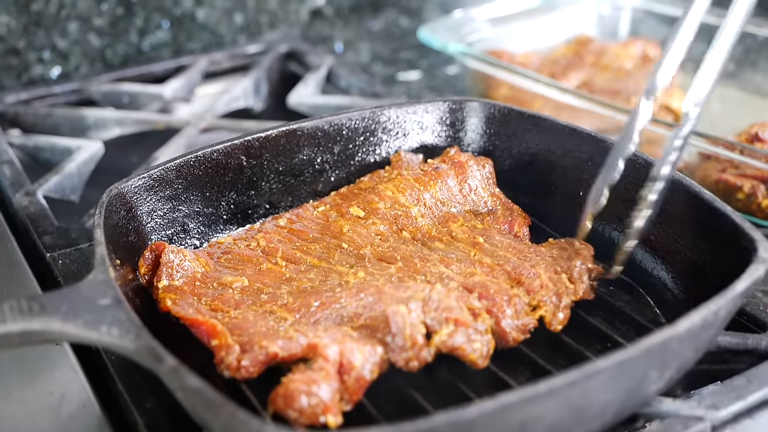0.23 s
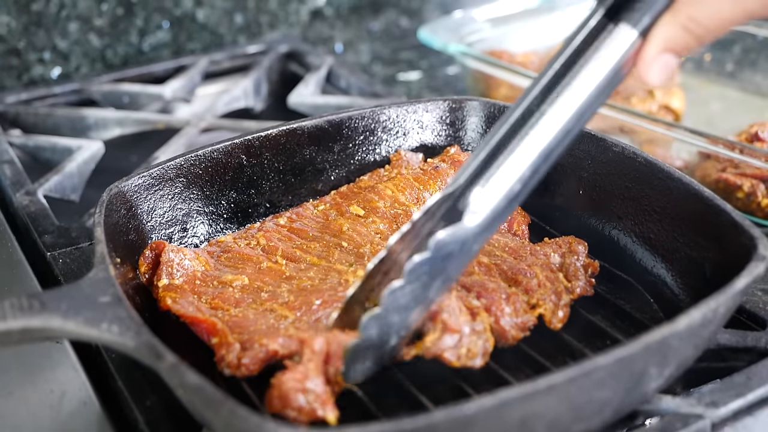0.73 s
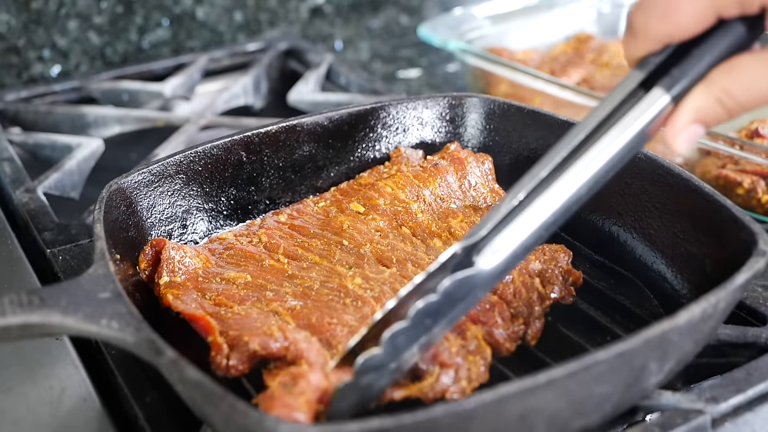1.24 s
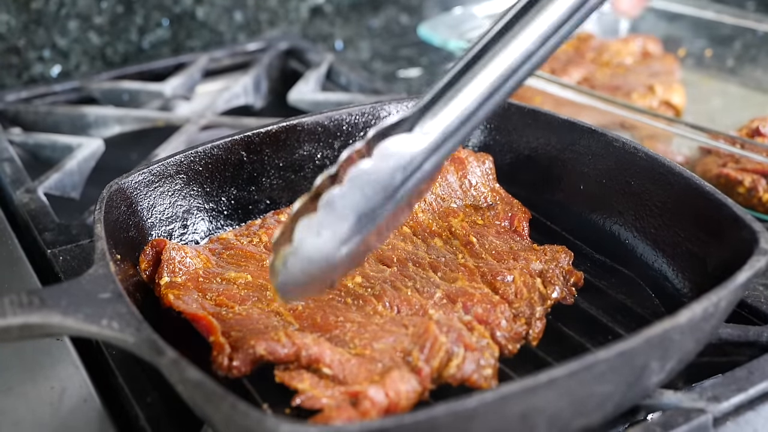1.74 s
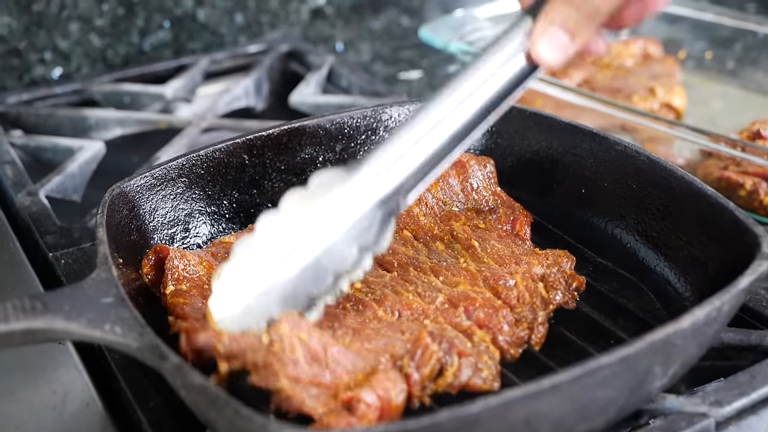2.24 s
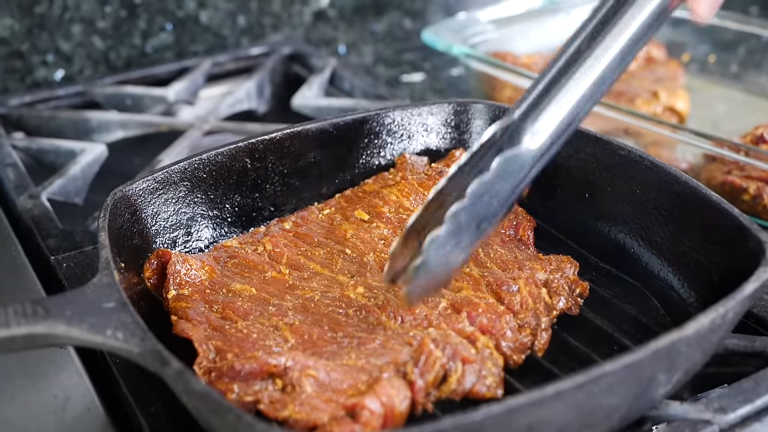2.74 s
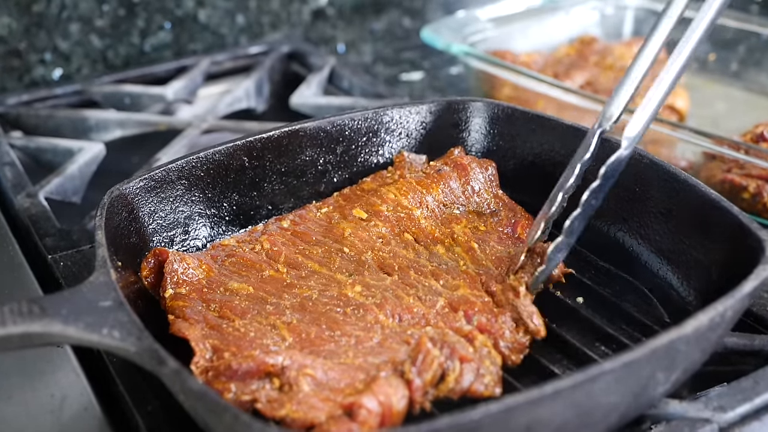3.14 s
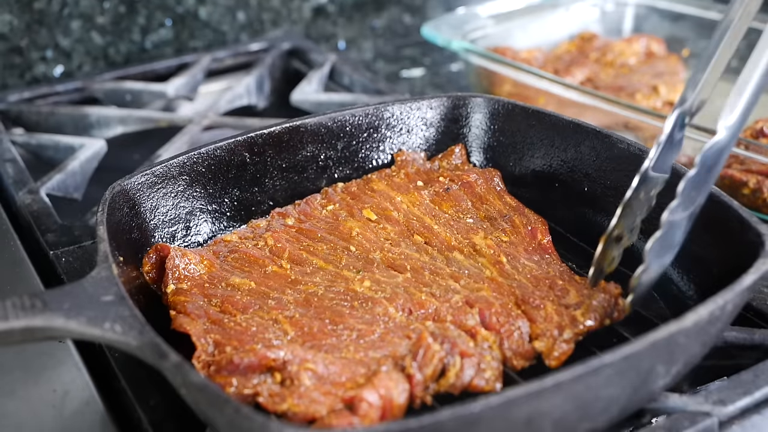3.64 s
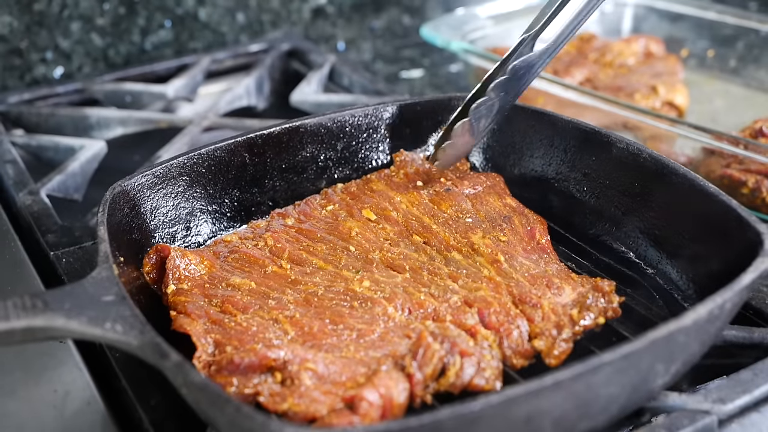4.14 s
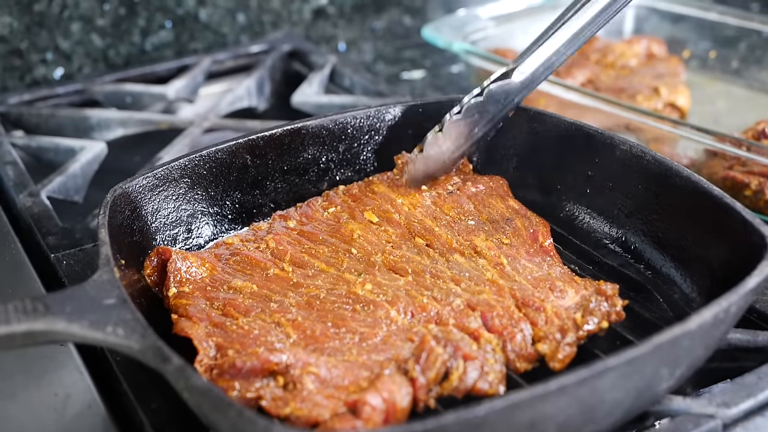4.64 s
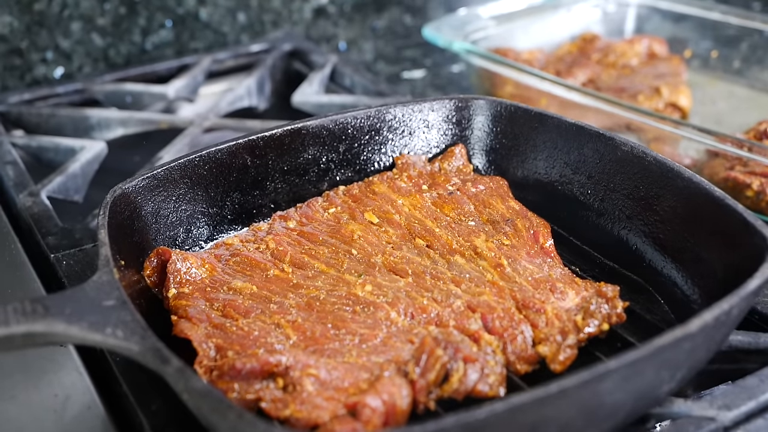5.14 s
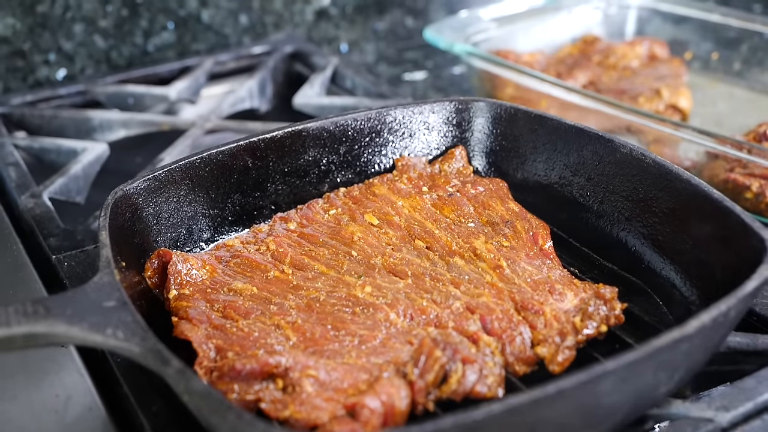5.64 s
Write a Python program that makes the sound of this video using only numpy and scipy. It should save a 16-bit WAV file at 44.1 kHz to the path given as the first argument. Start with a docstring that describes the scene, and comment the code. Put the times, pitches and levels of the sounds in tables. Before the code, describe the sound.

Continuous vigorous frying, already at full strength at the start and still going at the end. Fat spits in irregular crisp snaps, with brief squeaks of escaping steam. One short metal clank comes before one second; softer iron knocks follow past three seconds, along with a small flare of hiss as meat is pressed down. Faint low ventilation sits far below. Close microphone, little room sound, centred image.

```python
"""A dense, bright sizzle over a low fan hum: a wet steak frying in a ridged cast-iron pan in a kitchen.
The sizzle is noise with bubble and crackle grains, coloured by a spectrum and by air-channel resonances.
Short whistles are steam spurts, sharp cracks are water droplets in fat, and tongs ring against the iron
as decaying sines. Fan and burner are filtered noise and steady tones; a faint smeared copy adds width."""
import sys
import numpy as np
from scipy import signal
from scipy.io import wavfile
from scipy.ndimage import uniform_filter1d

SR = 44100
rng = np.random.default_rng(int(sys.argv[2]) if len(sys.argv) > 2 else 0)


def dump(signal):
    """Clip the signal to [-1, 1] and save it as 16-bit WAV at the path in sys.argv[1]."""
    limited = np.clip(np.atleast_2d(signal).T, -1, 1)
    pcm = np.round(limited * 32767).astype(np.int16)
    wavfile.write(sys.argv[1], SR, pcm)


N = 260466


def gain_of(db):
    """Converts decibels to an amplitude factor."""
    return 10 ** (np.asarray(db) / 20)


def evened(x):
    """Scales to rms 1."""
    return x / np.sqrt(np.mean(x ** 2) + 1e-20)


def read(points, hz):
    """Interpolates a spectrum on a log-frequency axis."""
    point_hz, value = np.transpose(points)
    return np.interp(np.log(hz + 1), np.log(point_hz + 1), value)


def add(mix, start_s, sound):
    """Mixes a sound in place, starting at start_s."""
    part = mix[round(start_s * SR):][:len(sound)]
    part += sound[:len(part)]


def shaped(x, field_db, size):
    """Filters x by a level in dB over frequency and time."""
    overlap = size * 3 // 4
    hz, t, z = signal.stft(x, SR, nperseg=size, noverlap=overlap)
    return signal.istft(z * gain_of(field_db(hz, t)), SR, nperseg=size, noverlap=overlap)[1][:N]


def coloured_noise(spectrum, size):
    """Steady noise of rms 1 with a given spectrum."""
    return evened(shaped(rng.standard_normal(N), lambda hz, t: read(spectrum, hz)[:, None], size))


def burst(hz, turns):
    """A few cycles under a bell envelope, mostly a pressure dip, centred on sample 100."""
    cycles = np.arange(-100, 101) * hz / SR
    phase_turns = rng.normal(0, .12)
    return -np.exp(-(cycles / turns) ** 2) * np.cos(2 * np.pi * (cycles + phase_turns))


def grains(lo_hz, hi_hz, turns, per_s, spread_db, count=24):
    """Bursts of many pitches at random moments; a few are much larger than the rest."""
    size_db = spread_db * np.minimum(rng.exponential(1, N), 3.6)
    size = gain_of(size_db) * (rng.random(N) < per_s / SR)
    kind, out = rng.integers(0, count, N), np.zeros(N)
    for k, hz in enumerate(np.geomspace(lo_hz, hi_hz, count)):
        grain = burst(hz, turns) * hz  # equal height in the spectrum
        out += signal.oaconvolve(size * (kind == k), grain, "same")
    return evened(out)


# overall frying strength: (time [s], level [dB])
VIGOUR = [(0, 1), (.5, 1), (1.0, 0.25), (1.6, -0.5), (2.2, -.5), (2.65, 0.5), (3.3, -.5), (3.7, -.5),
          (4.05, 0.5), (4.5, -1), (5.1, 0), (5.91, -.5)]
# steam pockets, large bubbles, small bubbles, spray, fine fizz: (peak frequency [Hz],
# share of vigour followed [ratio], change from loose to flat meat [dB], flare gain [dB])
FRYING_PARTS = [(1050, 1.3, -2, -1.5), (2090, 1.7, 1.5, 4.5), (3400, 0.71, 3.2, 0), (5850, 0.93, -1.7, .8),
                (8800, 0.68, 0.1, 4)]
# brief level dips just after loud pops: (time [s], level [dB])
DIPS = [(4.13, -2.5), (4.735, -2), (5.125, -2)]
DIP_RECOVERY_S = 0.062
FLARE_S, FLARE_WIDTH_S = 3.46, 0.082  # wet meat pressed onto bare iron


def vigour_db(hz, t, settled):
    """Each part follows vigour and meat settling by its own amount, with one flare and a few brief dips."""
    part_hz, follows, flat_db, flare_db = np.transpose(FRYING_PARTS)
    vigour = np.interp(t, *np.transpose(VIGOUR))
    flare = np.exp(-((t - FLARE_S) / FLARE_WIDTH_S) ** 2)
    level_db = sum(db * (t > s) * np.exp(-abs(t - s) / DIP_RECOVERY_S) for s, db in DIPS)
    controls = [(follows, vigour), (flat_db, settled - settled.mean()), (flare_db, flare)]
    for amount, control in controls:
        level_db = level_db + read(np.transpose([part_hz, amount]), hz)[:, None] * control
    return level_db


# how flat the meat lies: (time [s], flatness [0-1])
SETTLED = [(.3, 0.1), (2.0, 0.15), (3.3, 0.24), (4.1, 1)]
# air channels between ridges: (frequency [Hz], width [Hz], lift, meat loose [dB], lift, meat flat [dB])
CHANNELS = [(738, 35, 3.5, 4), (1064, 80, 6, 5), (1294, 67, 3, 5), (1880, 56, 9, 3), (2084, 105, 6, 4),
            (2275, 69, 5, 3.5), (2470, 130, -5, -2.5), (3050, 320, 3.5, 3), (3390, 270, 4.5, -5),
            (3410, 64, -5.5, 8.5), (3680, 80, -2, 3), (4080, 106, 6, 2.5), (5670, 410, 2, -1)]


def frying_db(hz, t):
    """Channel resonances shift as the meat settles; vigour, drifting patches and shared flutter add."""
    settled = np.clip(np.interp(t, *np.transpose(SETTLED)), 0, 1)
    lift = 0
    for channel_hz, width_hz, loose_db, flat_db in CHANNELS:
        resonance = 1 / (1 + (2 * (hz[:, None] - channel_hz) / width_hz) ** 2)
        lift = lift + (loose_db + (flat_db - loose_db) * settled) * resonance
    chance = rng.standard_normal((len(t), len(hz))).T
    patches = evened(uniform_filter1d(uniform_filter1d(chance, 9, 0), 9, 1))
    narrow = evened(uniform_filter1d(chance, 60, 1))  # single gaps that whistle faintly for a while
    flutter = evened(uniform_filter1d(rng.standard_normal(len(t)), 3))
    return lift + vigour_db(hz, t, settled) + .6 * patches + 1.1 * narrow + .6 * flutter


# sizzle colour before the channels act: (frequency [Hz], relative level [dB per Hz])
SIZZLE_SPECTRUM = [(450, -24), (600, -28), (690, -13), (950, -5), (1200, -8.5), (1700, -7), (2500, -3),
                   (3400, -3.5), (4600, -4.5), (5800, -3.5), (8100, -10.5), (12000, -9.5), (13200, -12),
                   (15500, -17)]
SIZZLE_RMS_DB = -21


def sizzle():
    """Steam hiss, bursting bubbles and fine crackle, all coloured by the pan."""
    hiss = rng.standard_normal(N)
    bubbles = grains(668, 6960, turns=2.7, per_s=1500, spread_db=2.5)
    crackle = grains(6800, 11300, turns=0.98, per_s=700, spread_db=4.6)
    raw = hiss + gain_of(-14) * bubbles + gain_of(-10) * crackle
    coloured = shaped(raw, lambda hz, t: read(SIZZLE_SPECTRUM, hz)[:, None], size=4096)
    return gain_of(SIZZLE_RMS_DB) * evened(shaped(coloured, frying_db, size=1024))


# fan and burner rush: (frequency [Hz], relative level [dB per Hz])
RUSH_SPECTRUM = [(18, -30), (30, -23), (48, -18), (65, -1), (100, -20), (150, -8), (200, -3.5), (290, -13),
                 (380, -3), (480, 2.5), (560, -7.5), (640, -3.5), (800, -27.5)]
RUSH_RMS_DB = -52


def air_rush():
    """Turbulent air of fan and flame: steady low noise."""
    return gain_of(RUSH_RMS_DB) * coloured_noise(RUSH_SPECTRUM, size=8192)


# motor tones: (frequency [Hz], mean rms level [dB])
MOTOR_TONES = [(52.3, -68), (59, -71), (76.2, -54), (117.6, -67), (119.9, -55), (177, -65), (234.5, -67),
               (360, -64)]


def motor_hum():
    """Fan motor tones of steady pitch, each wavering slightly in level."""
    t, hum = np.arange(N) / SR, np.zeros(N)
    for hz, rms_db in MOTOR_TONES:
        waver = evened(uniform_filter1d(uniform_filter1d(rng.standard_normal(N), 9000), 9000))
        tone = np.sqrt(2) * np.sin(2 * np.pi * (hz * t + rng.random()))
        hum += gain_of(rms_db + .5 * waver) * tone
    return hum


# loudest steam spurts: (centre time [s], peak level [dB], pitch [Hz])
SPURTS = [(.06, -21, 1340), (0.097, -21, 1280), (0.108, -20, 1260), (.177, -21, 1900), (.192, -21, 1280),
          (.289, -18, 2130), (.412, -25, 2380), (0.418, -18.5, 3920), (0.571, -17, 4100),
          (1.427, -19, 5960), (2.084, -24, 3800), (2.769, -22, 4310), (2.802, -18, 6200),
          (3.204, -19, 3770), (3.318, -20, 4400), (4.085, -21, 1870), (4.129, -16, 3490),
          (4.254, -24, 4570), (4.702, -17, 2820), (5.647, -17, 3030), (5.648, -21, 2410),
          (5.734, -20, 3800)]
SPURT_WIDTH_S, SPURT_WOBBLE_HZ = 0.0032, 60  # bell half-width to 1/e; rms pitch wobble


def spurts():
    """Steam escaping through a gap whistles roughly for a few milliseconds."""
    t, out = np.arange(-400, 401) / SR, np.zeros(N)
    envelope = np.exp(-(t / SPURT_WIDTH_S) ** 2)
    for s, peak_db, hz in SPURTS:
        drift = evened(uniform_filter1d(rng.standard_normal(len(t)), 60))
        wobble_turns = np.cumsum(drift) * SPURT_WOBBLE_HZ / SR
        whistle = np.sin(2 * np.pi * (hz * t + wobble_turns + rng.random()))
        add(out, s + t[0], gain_of(peak_db) * envelope * whistle)
    return out


# loudest droplets cracking in fat: (time [s], crack level [dB], crack pitch [Hz], push level [dB])
LOUD_POPS = [(0.1487, -18, 9600, -8), (0.1916, -8, 9600, -11), (0.3177, -10, 13000, -15),
             (0.4146, -14, 9600, -13), (0.5042, -13, 9600, -14), (0.5627, -11, 13000, -14),
             (0.8863, -7, 9600, -17), (1.066, -9, 11200, -19), (1.2853, -18, 9600, -12),
             (1.3207, -17, 8000, -9), (1.399, -4, 9600, -23), (1.7499, -4, 13000, -23),
             (1.9276, -10, 11200, -16), (2.0992, -9, 11200, -16), (2.7083, -6, 11200, -25),
             (2.8077, -12, 9600, -14), (2.8142, -17, 9600, -9), (2.849, -11, 9600, -15),
             (2.8539, -9, 13000, -24), (3.2546, -9, 9600, -18), (3.4586, -16, 9600, -12),
             (3.4695, -17, 9600, -8), (3.5521, -9, 11200, -27), (3.585, -5, 9600, -16),
             (4.1277, -8, 9600, -13), (4.2897, -9, 13000, -27), (4.3782, -9, 11200, -25),
             (4.39, -10, 11200, -13), (4.393, -9, 13000, -22), (4.7322, -13, 11200, -8),
             (5.0228, -8, 9600, -21), (5.1085, -9, 9600, -12), (5.122, -10, 11200, -23),
             (5.2382, -8, 11200, -23), (5.304, -7, 11200, -21), (5.411, -14, 9600, -13),
             (5.5631, -20, 9600, -10), (5.7046, -13, 9600, -12), (5.7648, -8, 11200, -9)]
SMALL_POPS, SMALL_CRACK_DB, SMALL_PUSH_DB = 160, -17, -18  # count, mean levels
PUSH_HZ = 3700


def pops():
    """A water droplet bursts in fat: a sharp crack with a duller push from the splash."""
    out = np.zeros(N)
    small = []
    for when, crack, pitch, push in rng.random((SMALL_POPS, 4)):
        crack_db = SMALL_CRACK_DB + 12 * (crack - .5)
        push_db = SMALL_PUSH_DB + 10 * (push - .5)
        small.append((when * N / SR, crack_db, 9600 + 3400 * pitch, push_db))
    for s, crack_db, hz, push_db in LOUD_POPS + small:
        crack = gain_of(crack_db) * burst(hz, .95)
        push = gain_of(push_db) * burst(PUSH_HZ, 1.1)
        add(out, abs(s - 100 / SR), crack + push)
    return out


def struck(modes, blows):
    """Each blow rings modes near the pitch its spot favours; a held contact shortens the ring."""
    t, out = np.arange(SR // 2) / SR, np.zeros(N)
    onset = np.minimum(t / 0.0054, 1)
    for s, strength_db, spot_hz, reach_octaves, free in blows:
        ring = np.zeros(len(t))
        for hz, mode_db, t60_s in modes:
            decay_db = 60 * t / (t60_s * free)
            off_spot_db = 6.9 * (np.log2(hz / spot_hz) / reach_octaves) ** 2
            ring += gain_of(mode_db - decay_db - off_spot_db) * np.sin(2 * np.pi * hz * t)
        add(out, s, gain_of(strength_db) * ring * onset)
    return out


# tong modes: (frequency [Hz], relative level [dB], free t60 [s])
TONG_MODES = [(640, -13, 0.084), (900, -9.5, 0.26), (972, 5, 0.057), (1270, 2, 0.05), (1380, -3, .04),
              (1840, -9.5, 0.2), (2130, -14, .06)]
# (time [s], strength [dB], favoured pitch [Hz], reach [octaves], share of free ring time [ratio])
TONG_BLOWS = [(.7605, -9, 1100, 2.0, .8), (.788, -17, 890, .2, 1), (.792, -14, 2050, .4, .6)]


def tongs():
    """The tongs ring in their own damped modes when they touch the iron."""
    return struck(TONG_MODES, TONG_BLOWS)


# pan modes: (frequency [Hz], relative level [dB], free t60 [s])
PAN_MODES = [(406, -8, 0.22), (537, 2.5, 0.052), (624, -3.5, 0.34), (877, 0.5, 0.43), (1000, -13, .15),
             (1100, -8, 0.14), (1475, 6, 0.16), (1970, -1, 0.3)]
# (time [s], strength [dB], favoured pitch [Hz], reach [octaves], share of free ring time [ratio])
PAN_BLOWS = [(1.29, -35, 450, .6, 0.91), (1.33, -32, 420, 0.49, 0.8), (3.055, -30.5, 630, 0.31, 0.63),
             (3.085, -32.5, 624, 0.18, 1), (3.15, -30, 740, 0.37, 1), (3.578, -22, 1310, 1.5, 0.82),
             (3.589, -34, 950, 0.39, 0.79), (3.61, -35, 1700, 1.1, .7), (3.643, -25.5, 410, 0.63, 0.8),
             (3.646, -27, 1300, 0.99, 0.38)]


def pan():
    """The struck cast iron rings in its own damped modes."""
    return struck(PAN_MODES, PAN_BLOWS)


# side signal: (frequency [Hz], level relative to mid [dB])
SIDE_LEVEL = [(60, -23), (180, -26.5), (550, -18.5), (1650, -22.5), (4970, -67), (15000, -51)]
SMEAR_T60_S = 0.12


def side_copy(mid):
    """A faint smeared copy, nearly without treble, opposite in sign left and right."""
    t = np.arange(3000) / SR
    smear = rng.standard_normal(len(t)) * gain_of(-60 * t / SMEAR_T60_S)
    smeared = signal.oaconvolve(mid, smear / np.linalg.norm(smear))[:N]
    return shaped(smeared, lambda hz, t: read(SIDE_LEVEL, hz)[:, None], size=1024)


def scene():
    """Sums all sources straight ahead and adds the smeared side copy."""
    mid = sizzle() + air_rush() + motor_hum() + spurts() + pops() + tongs() + pan()
    side = side_copy(mid)
    return np.array([mid + side, mid - side])


BASS_CUT_HZ, TREBLE_EDGE_HZ = 42, 15670


def record(dry):
    """The microphone drops the deepest bass; a steep low-pass then limits the treble."""
    bass_cut = signal.butter(2, BASS_CUT_HZ, "high", fs=SR, output="sos")
    thinned = signal.sosfilt(bass_cut, dry)
    band_limit = signal.firwin(1023, TREBLE_EDGE_HZ, window=("kaiser", 9), fs=SR)
    return signal.oaconvolve(thinned, band_limit[None], "same")


dry = scene()
out = record(dry)
dump(out)
```